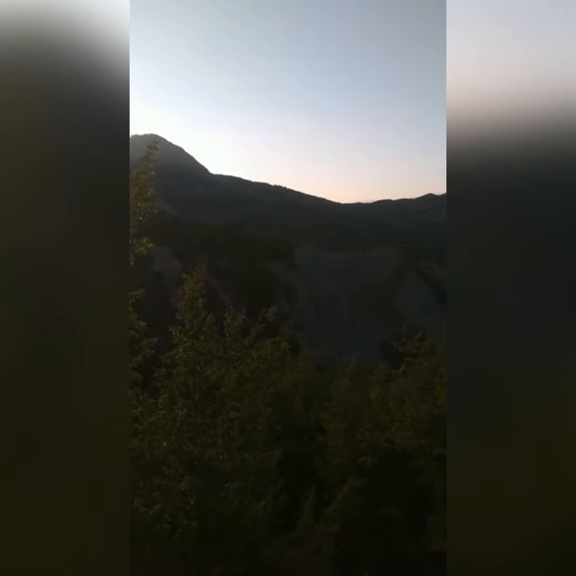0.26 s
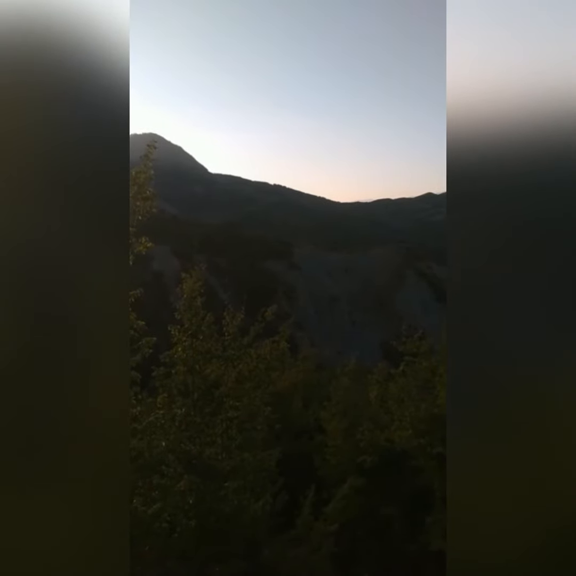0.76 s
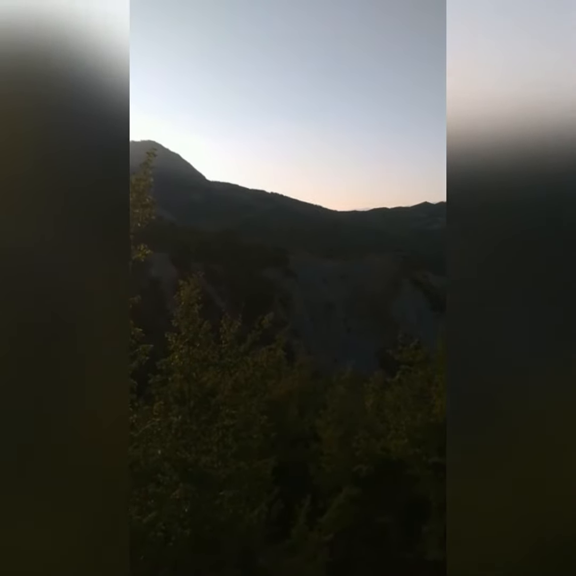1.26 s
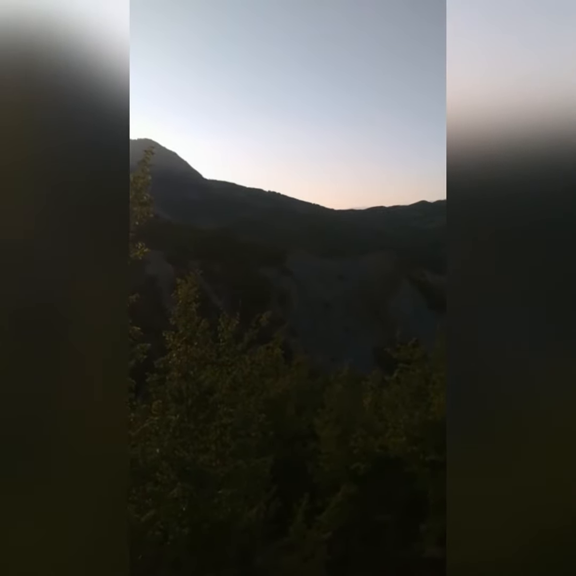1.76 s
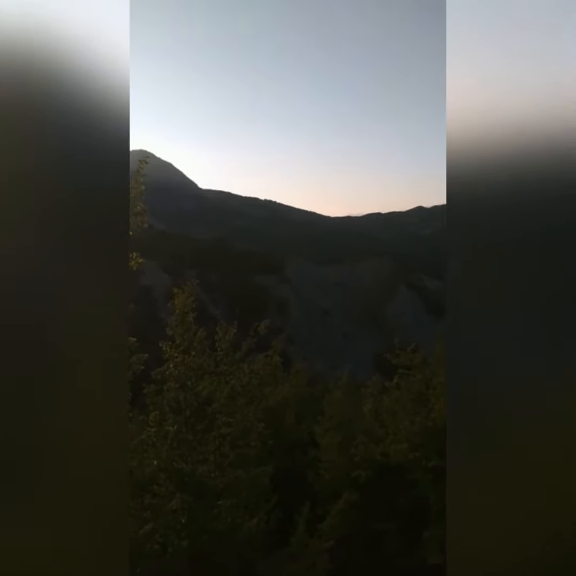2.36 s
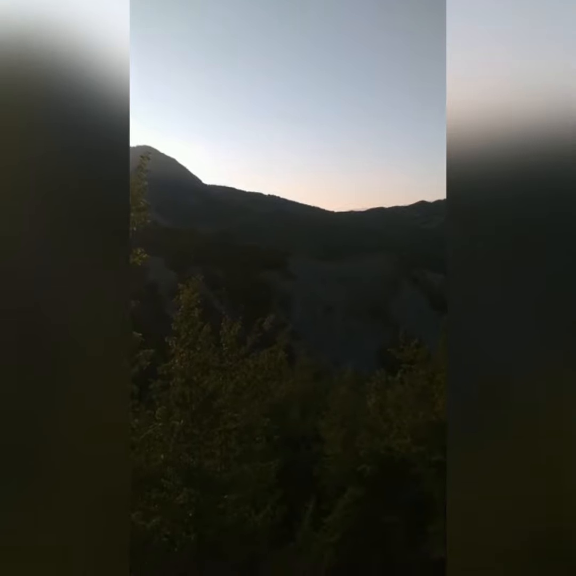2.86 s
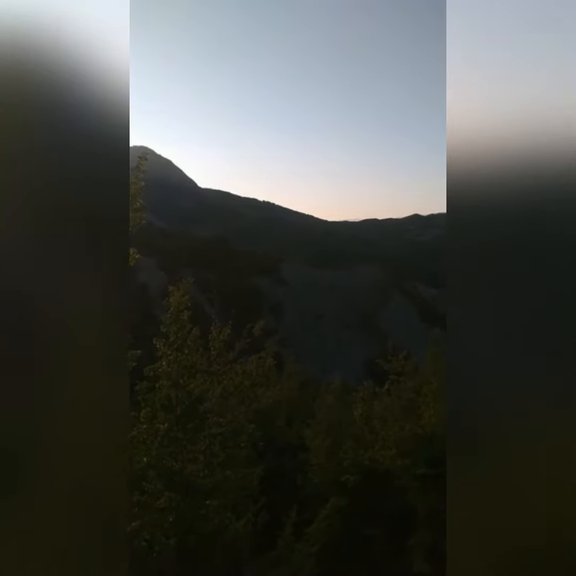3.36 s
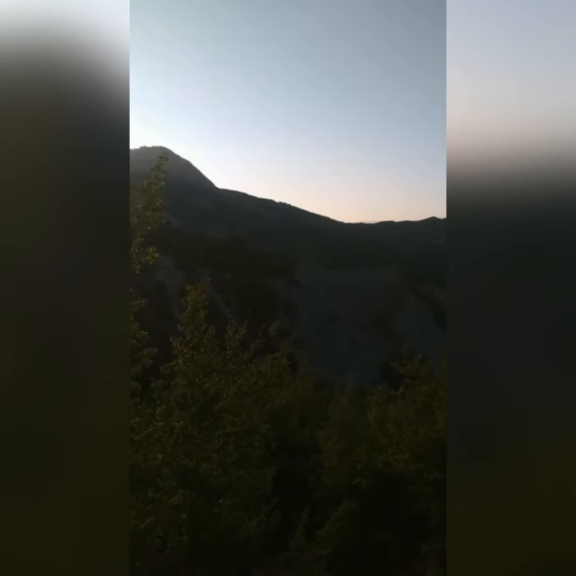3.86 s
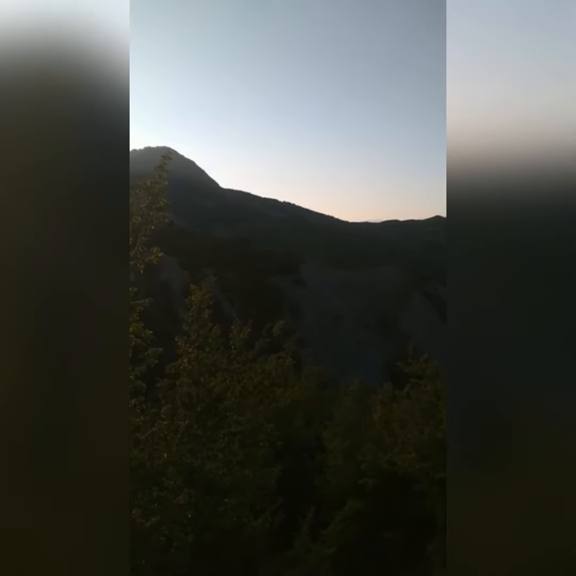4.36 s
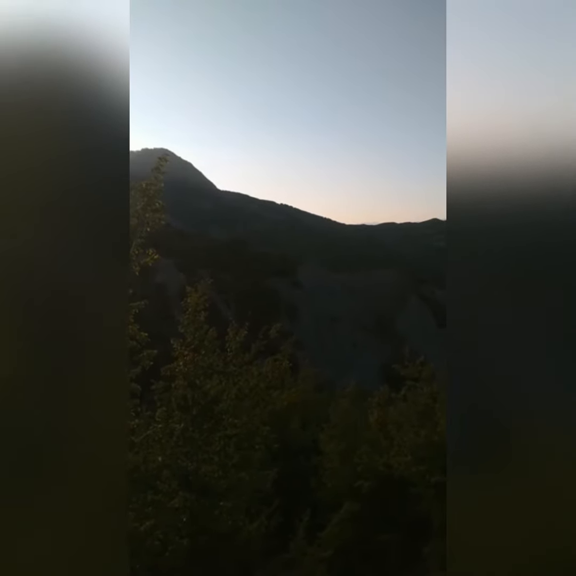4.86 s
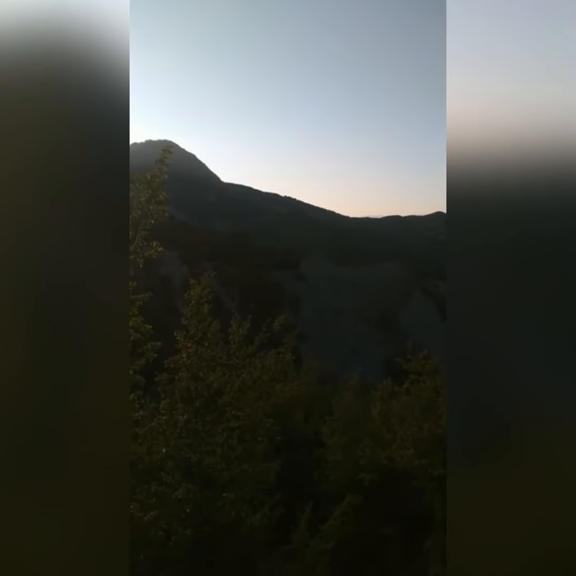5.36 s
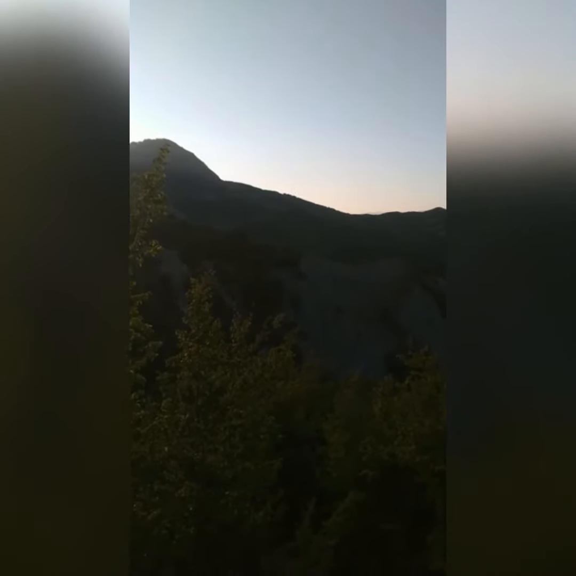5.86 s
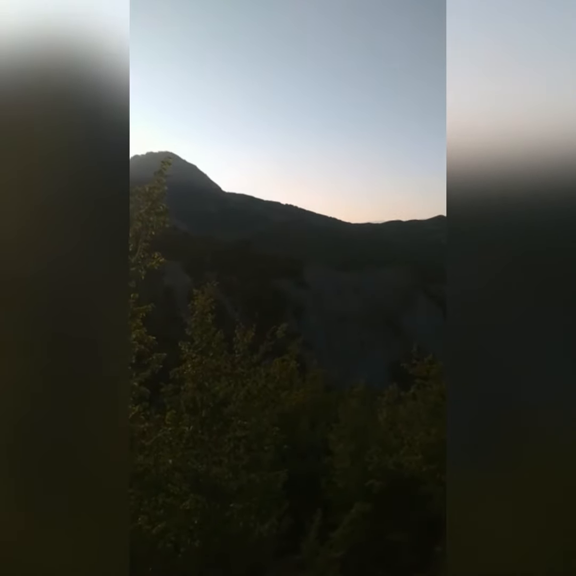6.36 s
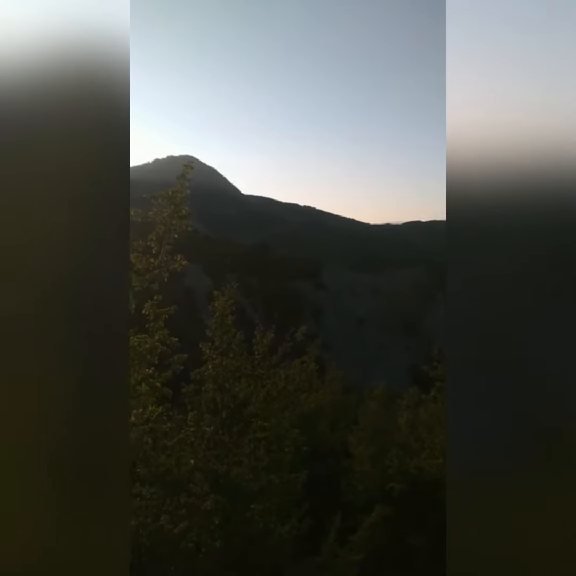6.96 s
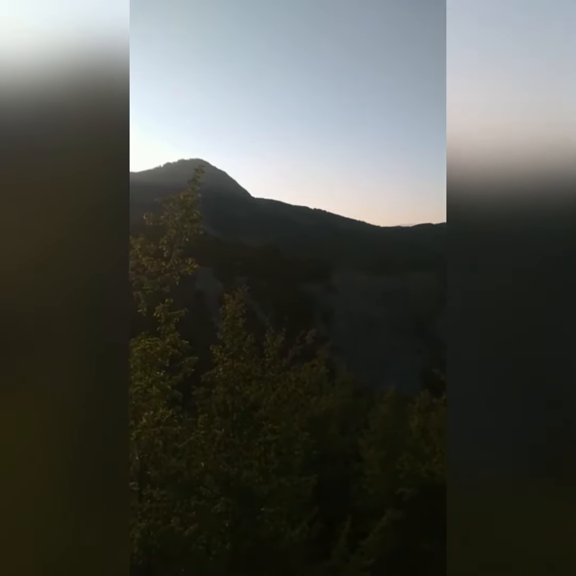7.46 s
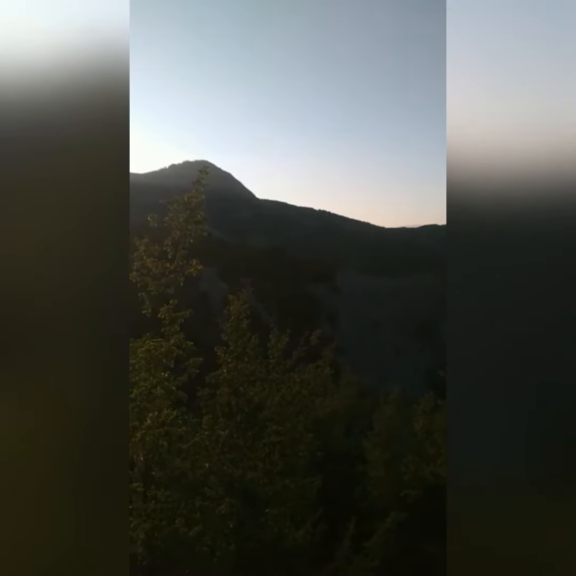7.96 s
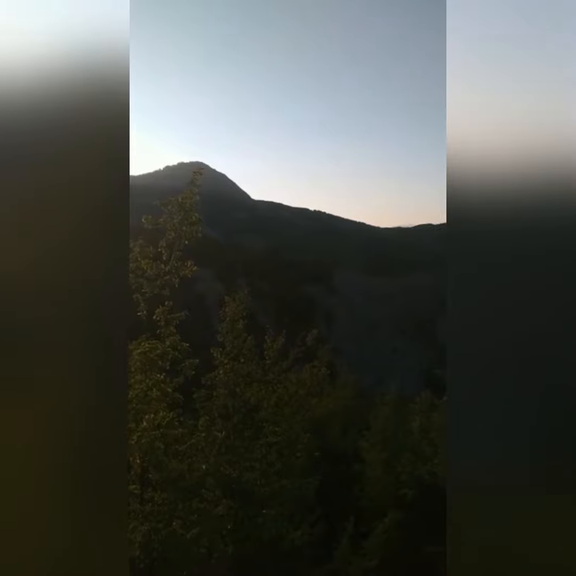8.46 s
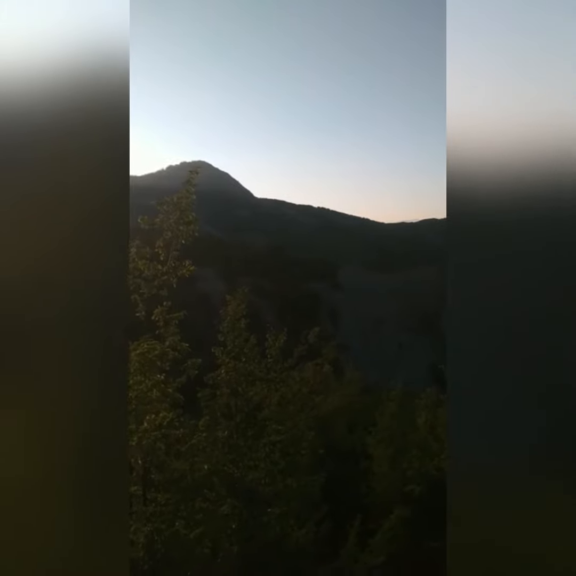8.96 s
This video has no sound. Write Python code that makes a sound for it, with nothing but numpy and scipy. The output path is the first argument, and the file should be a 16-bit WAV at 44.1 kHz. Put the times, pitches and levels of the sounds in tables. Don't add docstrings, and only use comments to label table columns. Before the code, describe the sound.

Outdoors in a mountain valley, two far-off hounds yelp repeatedly, short pure high cries that crack upward, each trailed by blurred echoes. Soft wind swells early. A hard knock hits the handheld phone around three seconds, with smaller bumps near six. Around eight seconds fingers scrape and snap loudly on the left side, then taps follow as the yelps die away. Quiet gaps flicker abruptly to near silence.

```python
import sys
import numpy as np
from scipy import signal
from scipy.fft import rfft, irfft, next_fast_len
from scipy.io import wavfile
from scipy.ndimage import uniform_filter1d, map_coordinates

SR = 44100
rng = np.random.default_rng(int(sys.argv[2]) if len(sys.argv) > 2 else 0)


def generate_wav(sig):
    pcm = np.round(np.clip(np.atleast_2d(sig).T, -1, 1) * 32767).astype(np.int16)
    wavfile.write(sys.argv[1], SR, pcm)


def boost(x):
    u = np.asarray(x, float) / 20
    return 10 ** u


N = 406602


def unit(x):
    return x / np.sqrt(np.mean(x ** 2, axis=-1, keepdims=True) + 1e-20)


def along(points, hz):
    f, v = np.transpose(points)
    return np.interp(np.log(hz + 1), np.log(f + 1), v)


def wobble(rate, n=N):
    knots = rng.standard_normal(int(n * rate / SR) + 4)
    return map_coordinates(knots, [np.arange(n) * rate / SR])


def coloured(x, spectrum):
    m = next_fast_len(x.shape[-1] + 8192)
    response = boost(along(spectrum, np.fft.rfftfreq(m, 1 / SR)))
    return irfft(rfft(x, m) * response, m)[..., :x.shape[-1]]


def noise(spectrum, n=N, channels=2):
    return unit(coloured(rng.standard_normal((channels, n)), spectrum))


def span(rows, fade):
    s, *cols = np.transpose(rows)
    t = np.arange(max(s[0] - fade, 0), s[-1] + fade, 1 / SR)
    edge = np.clip(np.minimum(t - s[0], s[-1] - t) / fade + 1, 0, 1) ** 2
    return round(t[0] * SR), t, [np.interp(t, s, c) for c in cols], edge


def add(track, start, x):
    n = min(x.shape[-1], N - start)
    track[..., start:start + n] += x[..., :n]


def gate():
    # t/s, end t/s
    closed = [(0.2279, 0.237), (0.8797, 0.9253), (0.9282, 0.9491), (0.9661, 0.9959), (1.9336, 1.9735),
              (2.2399, 2.2916), (2.3254, 2.341), (2.3501, 2.3794), (2.4071, 2.4417), (3.4464, 3.4731),
              (3.4762, 3.5169), (3.5342, 3.6109), (3.8906, 3.9089), (4.2018, 4.216), (4.969, 4.9909),
              (5.3997, 5.4166), (5.4752, 5.4883), (6.241, 6.2597), (6.2987, 6.3206), (6.6958, 6.7494),
              (6.9804, 6.9927), (7.0304, 7.0571), (7.4444, 7.4625), (7.5383, 7.5727), (8.7658, 8.7867),
              (8.9352, 8.9579), (8.9745, 9.029), (9.0544, 9.0969), (9.109, 9.16), (9.1791, 9.22)]
    # t/s, end t/s, share closed
    chatter = [(.538, .5844, .7), (1.8, 1.9, .3), (1.98, 1.994, .6), (2.205, 2.225, .35),
               (2.3936, 2.407, .7), (3.127, 3.1494, .8), (4.23, 4.2454, .6), (5.0011, 5.032, .9),
               (5.032, 5.062, .93), (5.063, 5.0889, .97), (5.808, 5.881, .3), (6.226, 6.241, .6),
               (6.6507, 6.695, .92), (7.49, 7.53, .75), (8.669, 8.762, .66)]
    blinks = [.143, .18, .262, .29, .47, .83, 1.755, 2.745, 3.337, 3.783, 3.841, 4.143, 6.33, 6.568, 7.018,
              7.977, 8.237, 8.856]
    blink_s = .0016
    turns_per_s = 110
    shut, hunt = np.zeros(N, bool), wobble(turns_per_s)
    for s, end in closed + [(s, s + blink_s) for s in blinks]:
        shut[round(s * SR):round(end * SR)] = True
    for s, end, share in chatter:
        spell = slice(round(s * SR), round(end * SR))
        shut[spell] |= hunt[spell] < np.quantile(hunt[spell], share)
    return uniform_filter1d(np.where(shut, boost(-29.5), 1.), size=8)


def wind():
    # t/s, level/dB, left-right level/dB
    gusts = [(0, -73, 3), (.9, -71.5, 9.5), (1.15, -68, 4), (1.301, -57.5, -4.5), (1.45, -54, 4.5),
             (1.6, -68.5, 1.5), (2.0, -69, 10.5), (2.901, -70, 2.5), (3.35, -73.5, -1), (3.799, -68.5, 2),
             (4.699, -72, 1.5), (5.15, -68, 1), (6.049, -68.5, -1), (7.4, -70, -2), (7.85, -72, 14.5),
             (8.301, -67, 14.5), (8.751, -63.5, 1), (9.2, -66, 10)]
    # f/Hz, level per Hz/dB
    buffet_spectrum = [(8, -15.5), (25, 1.5), (60, -10.5), (120, -14.5), (300, -33), (700, -73.5)]
    # f/Hz, level per Hz/dB
    air_spectrum = [(60, -34.5), (140, -9), (215, 1.5), (290, -4), (500, -7), (900, -9.5), (2400, -17.5),
                    (3200, -18.5)]
    calm_db, air_calm_db, air_follows = -69, -74, 0.37
    s, *levels = np.transpose(gusts)
    strength_db, side_db = (np.interp(np.arange(N) / SR, s, db) for db in levels)
    ports_db = np.array([strength_db + side_db / 2, strength_db - side_db / 2])
    lumps = boost(0.61 * np.array([wobble(9), wobble(6.9)]))
    buffet = boost(ports_db + 6.5) * unit(lumps * noise(buffet_spectrum))
    air_db = air_calm_db + air_follows * (strength_db - calm_db) + 1.5 * wobble(2.8)
    return buffet + boost(air_db + 8.5 + 2.6 * wobble(12)) * noise(air_spectrum)


def rubs():
    # peak t/s, fade/s, scrape level/dB, rumble level/dB, fizz level/dB
    strokes = [
        (7.82, .05, -49.5, -30, -93),
        (7.85, .075, -44.5, -33.5, -87.5),
        (8.125, .09, -50.5, -49.5, -92),
        (8.164, 0.055, -49.5, -45, -92.5),
        (8.194, 0.021, -46.5, -31, -83.5),
        (8.319, 0.029, -39.5, -24.5, -59),
        (8.364, .095, -51, -58.5, -69.5),
        (8.399, 0.028, -69, -60.5, -61.5),
    ]
    # f/Hz, level per Hz/dB
    scrape = [(200, 1), (500, 1), (1600, 0.5), (2600, -11), (3300, -33), (5500, -50.5), (9000, -120)]
    # f/Hz, level per Hz/dB
    grip = [(15, -15.5), (60, 8.5), (200, 4.5), (500, -9), (2500, -100)]
    # f/Hz, level per Hz/dB
    fizz = [(2500, -9.5), (4000, -3), (7000, -4), (9000, -18), (15000, -34)]
    rise_share, start_db, end_db = .35, -10.5, -22.5
    out = np.zeros((2, N))
    for s, fade, *levels in strokes:
        rows = [(s - rise_share * fade, *np.add(levels, start_db)),
                (s, *levels),
                (s + fade, *np.add(levels, end_db))]
        start, t, (scrape_db, rumble_db, fizz_db), edge = span(rows, fade=.006)
        stick = boost(2.75 * wobble(200, len(t)))
        rub = boost(scrape_db + 8.0) * stick * noise(scrape, len(t), channels=1)
        rub += boost(rumble_db - 2.5) * noise(grip, len(t), channels=1)
        rub += boost(fizz_db) * noise(fizz, len(t), channels=1)
        add(out[0], start, edge * rub[0])
    return out


def knocks():
    # t/s, peak level/dB, left-right level/dB, ring f/Hz, direction
    thuds = [
        (1.806, -37, 7, 147, 0.68),
        (3.209, -12, -17.5, 136.3, -1),
        (3.402, -37.5, 10, 144, 0.96),
        (5.559, -32, -23, 162, 1),
        (6.108, -36, -21, 70.7, -0.81),
        (6.123, -33.5, -18.5, 70.5, -1.2),
        (6.342, -34.5, 19.5, 150, 0.942),
        (8.8722, -24.5, -19.5, 114.7, 1),
        (8.9025, -25.5, -31, 107.5, -1.3),
    ]
    taps = [
        (3.2042, -37, 13.5, 1260, 1),
        (3.2049, -6, -20.5, 335, -1.135),
        (6.0891, -24, 13, 380, 0.87),
        (7.9338, -18.5, 26, 229, -1.1),
        (8.7996, -25, -15, 280, -0.91),
        (8.8692, -14.5, -22.5, 301, -0.91),
    ]
    snaps = [
        (8.2958, -1, 41.5, 920, -0.91),
        (8.3053, -11, 35.7, 849, -1.1),
        (8.3142, 1, 34, 1294, -1.252),
        (8.3152, -12.5, 33, 900, -0.49),
    ]
    pings = [
        (8.7988, -37.5, 17, 1930, 1),
        (8.8678, -36, -15, 1630, -1.04),
    ]
    # t/s, peak level/dB, build/s, release/s
    press = (7.826, -15, .009, .02)
    # f/Hz, level/dB
    case = [(10, -8.5), (40, -2), (2400, 4), (3400, -10.5), (6500, -6.5), (11000, -22), (16000, -62.5)]
    # t/s, peak level/dB, f/Hz
    creaks = [
        (1.06, -70, 7050),
        (3.2045, -61, 7370),
    ]
    out, t = np.zeros((2, N)), np.arange(SR // 10) / SR
    for rows, cycles in (thuds, 2.93), (taps, 1.58), (snaps, 0.94), (pings, 12.1):
        for s, db, pan_db, hz, direction in rows:
            t60 = cycles / hz
            swing = direction * np.sin(2 * np.pi * hz * t) * boost(db - 60 * t / t60)
            add(out, round(s * SR), swing * boost([[min(pan_db, 0)], [min(-pan_db, 0)]]))
    s, db, build, release = press
    u = np.arange(N) / SR - s
    pressure = np.where(u < 0, np.exp(-abs(u) / build), -1.1 * np.exp(-abs(u) / release))
    out[0] += boost(db) * uniform_filter1d(pressure, size=260)
    out = coloured(out, case)
    for s, db, hz in creaks:
        decay = boost(db + 12 - 60 * t / 0.00542)
        add(out, round(s * SR), decay * np.sin(2 * np.pi * hz * t) * np.minimum(t / 0.0018, 1))
    return out


def valley(voice):
    # f/Hz, t60/s
    slopes = [(600, 0.19), (1100, 2.32), (2200, 2.5), (3000, 1.34)]
    gap_s, build_s = 0.014, 0.03
    near_db, near_t60 = 9, 0.26
    hz, t, z = signal.stft(rng.standard_normal((2, SR)), SR, nperseg=256)
    decay = boost(-60 * t / along(slopes, hz)[:, None]) + boost(near_db - 60 * t / near_t60)
    tail = signal.istft(z * decay * np.clip((t - gap_s) / build_s, 0, 1), SR, nperseg=256)[1]
    tail[1] = 0.095 * tail[0] + 0.565 * tail[1]
    return signal.fftconvolve(voice[None], tail / np.linalg.norm(tail[0]), axes=1)


def slide(s, length, from_hz, to_hz, db):
    # share of length, share of climb, level/dB
    course = [(0, 0.036, -11), (.25, .45, -2), (.6, .88, 0), (.8, 0.958, -12), (1, 1, -24)]
    return [(s + u * length, from_hz + v * (to_hz - from_hz), db + drop) for u, v, drop in course]


def arch(s, climb, from_hz, top_hz, db, drop_db, waits):
    # t/s, share of top pitch, level/dB
    sag = [(0, 0.97, 1.5), (.02, .87, -7.5)]
    sag_s, drop_s = .078, .04
    if waits:
        rows = [(s, from_hz, db - 15), (s + .71 * climb, from_hz, db - 15)]
    else:
        rows = [(s, from_hz, db - 7)]
    rows += [(s + min(climb, sag_s), top_hz, db - 1.5)]
    rows += [(s + sag_s + u, v * top_hz, db + sag_db) for u, v, sag_db in sag]
    return rows + [(s + sag_s + drop_s, .45 * top_hz, db + drop_db)]


def high(rows, open_db):
    scoop_s, scoop_share, scoop_db = .013, .75, -14
    closes_hz, closes_db_per_hz, least_db = 1062, .09, -27
    s, hz, db = rows[0]
    rows = [(s - scoop_s, scoop_share * hz, db + scoop_db)] + rows
    reached_hz = np.maximum.accumulate([row[1] for row in rows])
    out = []
    for row, top in zip(rows, reached_hz):
        second_db = open_db - closes_db_per_hz * max(top - closes_hz, 0)
        out.append((*row, row[2] + max(second_db, least_db)))
    return out


def high_hound():
    # t/s, length/s, from f/Hz, to f/Hz, peak level/dB
    slides = [
        (1.01, .14, 1040, 1360, -43.5),
    ]
    # t/s, climb/s, from f/Hz, top f/Hz, peak level/dB
    arches = [
        (2.0, .045, 1254, 1414, -45),
        (2.471, .05, 1125, 1433, -44.5),
    ]
    glides = [
        (1.572, 0.0755, 1173, 1304, -52),
    ]
    spent = [
        (4.268, 0.056, 984, 1451, -43.5),
    ]
    # left-right level/dB, left lead/rad
    place = (-6.5, 0.17)
    for row in slides:
        yield high(slide(*row), open_db=-3), row[-1], *place
    for calls, drop_db, waits in (arches, -12, True), (glides, -12, False), (spent, -37, False):
        for row in calls:
            yield high(arch(*row, drop_db, waits), open_db=-17.5), row[-1], *place


def low_place(s):
    # t/s, left-right level/dB, left lead/rad,
    # 2nd partial level in chest/dB, 2nd partial level when held/dB
    heading = [(0.04, 5, 0.8, 0.5, 1.5), (.3, 2.5, 0.62, 0, -3), (.637, 3.5, -1.126, 2, -1),
               (2.535, 1.5, -1.1, 7, 4.5), (2.92, 5, -0.83, -3, -3), (3.19, 1, .25, -5.5, -2),
               (3.64, 0, -1.06, -1, -0.5), (4.0, 6.5, 0.59, 3.5, 1), (4.45, 6.5, 0.119, 1.5, 4.5),
               (4.745, 5, -0.56, -10.5, 0), (5.14, 4, -0.4, -2.5, -3.5), (5.53, 5.5, -.75, 5.5, -3),
               (5.96, 4, -0.49, 1.5, 5), (6.37, -3, -0.65, -7.5, -2), (6.82, -8, 0, 6.5, 4.5),
               (7.19, 2, 1.32, 4.5, 1), (7.61, 5.5, 0.84, 0.5, -4.5), (8.02, 2, -0.4, -4.5, 5.5)]
    t, *cols = np.transpose(heading)
    return [np.interp(s, t, c) for c in cols]


def low_hound():
    # leap t/s, hold/s, held f/Hz, last f/Hz, peak level/dB
    leaps = [(0.035, 0.037, 1007, 1104, -47.5), (0.636, 0.053, 1005, 1038, -45.5),
             (2.536, 0.035, 1138, 1267, -43), (2.921, 0.047, 1047, 1067, -44.5),
             (3.188, 0.071, 1091, 1062, -45), (3.641, 0.065, 1101, 1161, -46.5),
             (4.451, 0.063, 1026, 1075, -45), (4.741, 0.042, 1042, 1190, -35.5),
             (5.135, 0.055, 1066, 1149, -40), (5.532, 0.095, 1163, 1187, -45.5),
             (5.954, .045, 1011, 1120, -48.5), (6.367, 0.063, 1068, 1124, -43),
             (6.814, 0.052, 1069, 1318, -36.5), (7.19, 0.061, 1179, 1309, -41),
             (7.61, 0.0971, 1189, 1250, -42), (8.023, 0.06, 1050, 1037, -49)]
    # t/s, length/s, from f/Hz, to f/Hz, peak level/dB
    slides = [
        (0.281, .2, 852, 1171, -52),
        (4.004, .13, 829, 1119, -48.5),
    ]
    held_db = (-59, -61, -55.5, -68.5)
    chest_s, leap_s, flip_s, tail_s = .027, .006, .008, .03
    swell_db, fade_db, tail_db = -6.5, -4, -13.5
    flip_costs_db = 24.5
    dull_hz, dull_db_per_hz = 1275, .3
    for s, hold, hz, last_hz, db in leaps:
        pan_db, lead, chest_db, bright_db = low_place(s)
        break_hz = 907 + .3 * (hz - 1080)
        leap, peak, flip, end = np.add(held_db, bright_db)
        lost = flip_costs_db * abs(np.log2(last_hz / hz))
        dulled = dull_db_per_hz * max(last_hz - dull_hz, 0)
        flipped = s + hold + flip_s
        rows = [(s - leap_s - chest_s, .91 * break_hz, -68, -72.5 + chest_db),
                (s - leap_s, break_hz, -59.5, -53 + chest_db),
                (s, .99 * hz, db + swell_db, leap),
                (s + .68 * hold, hz, db, peak),
                (s + hold, hz, db + fade_db, flip),
                (flipped, last_hz, db + fade_db - lost, flip - dulled),
                (flipped + tail_s, last_hz, db + tail_db - lost, end - dulled)]
        yield rows, db, pan_db, lead
    for row in slides:
        rows = [(*point, point[2] - 13) for point in slide(*row)]
        yield rows, row[-1], *low_place(row[0])[:2]


def phonation(t, hz, first, second):
    # t/s, end t/s, level/dB
    doubled = [
        (.625, .7, -16),
        (6.375, 6.47, -19),
    ]
    jitter, shimmer_db = 0.0071, 3.26
    breakup, breakup_s = 2.5, .035
    ending = np.clip(2 * (t - t[-1] + breakup_s) / breakup_s, 0, 1)
    unsteady = 1 + jitter * (1 + breakup * ending) * wobble(150, len(t))
    turn = 2 * np.pi * np.cumsum(hz * unsteady) / SR
    third = second * boost(-7 - np.clip(.13 * (hz - 860), 0, 14))
    voice = np.zeros(len(t), complex)
    for k, partial in enumerate((first, second, third), 1):
        voice += partial * boost(3.5 + shimmer_db * wobble(80, len(t))) * np.exp(1j * k * turn)
    for s, end, db in doubled:
        halves = np.exp(1.5j * turn) + np.exp(2.5j * turn)
        voice += ((t > s) & (t < end)) * first * boost(db) * halves
    return voice


def hounds():
    # f/Hz, level per Hz/dB
    throat = [(600, -33), (900, -15.5), (1200, 2), (1500, -9.5), (2100, -8), (2700, -10), (3200, -31)]
    # f/Hz, level/dB, age/s
    earlier = (1330, -47, 0.24)
    hoarse_db, direct_share = -13, 0.39
    aimed, usual_db = .5, -44.5
    out = np.zeros((2, N))
    for rows, peak_db, pan_db, lead in [*low_hound(), *high_hound()]:
        echo_db = -5.5 - .5 * (rows[0][0] - N / SR / 2) - aimed * (peak_db - usual_db)
        pressure = [(s, hz, boost(first_db), boost(second_db)) for s, hz, first_db, second_db in rows]
        start, t, (hz, first, second), edge = span(pressure, fade=.008)
        voice = phonation(t, hz, first, second)
        hoarse = first * boost(hoarse_db) * noise(throat, len(t), channels=1)[0]
        ports = boost([[pan_db / 2], [-pan_db / 2]]) * np.exp([[.5j * lead], [-.5j * lead]])
        add(out, start, edge * np.imag(ports * (voice + 1j * direct_share * hoarse)))
        answer = valley(edge * (voice.imag + hoarse))
        add(out, start, boost(echo_db + 2.5 * wobble(140, answer.shape[1])) * answer)
    hz, db, ago = earlier
    turn = 2 * np.pi * np.cumsum(hz * (1 + 0.059 * wobble(30, SR // 10))) / SR
    gone = valley(boost(db) * np.sin(turn))[:, round(ago * SR):]
    add(out, 0, boost(1.8 * wobble(140, gone.shape[1])) * gone)
    return out


def scene():
    # f/Hz, level/dB
    treble_cut = [(10, -1), (30, -0.5), (2600, -1), (2900, -7.5), (3300, -22), (4000, -32), (7000, -42),
                  (16000, -60.5)]
    shade_db = -8 * np.clip((np.arange(N) / SR - 8.3) / .03, 0, 1)
    return coloured(hounds() * boost(shade_db) + wind(), treble_cut) + knocks() + rubs()


def low_pass(x):
    return signal.sosfilt(signal.butter(12, 16000, fs=SR, output="sos"), x)


def record(dry):
    # f/Hz, level per Hz/dB
    hiss = [(2000, -9), (3500, 1), (12800, -1), (13500, -13.5)]
    heard = (dry + boost(-94.5) * noise(hiss)) * gate()
    return low_pass(heard)


dry = scene()
out = record(dry)
generate_wav(out)
```